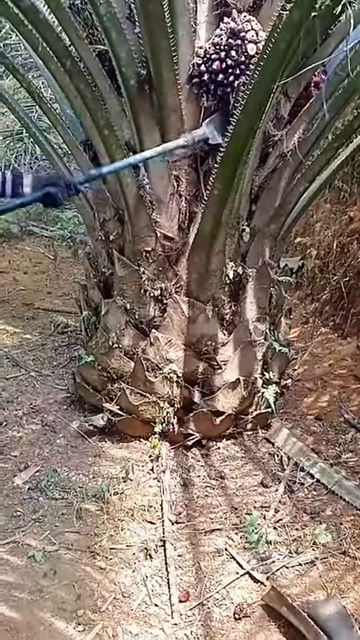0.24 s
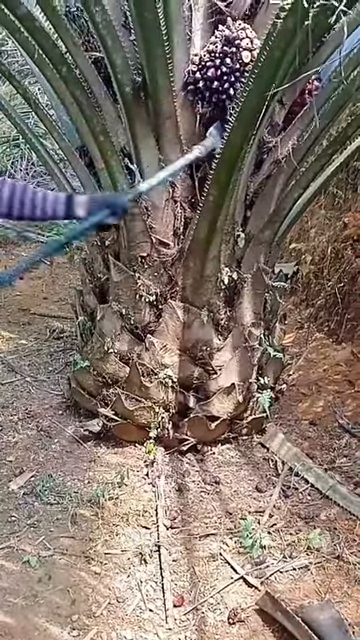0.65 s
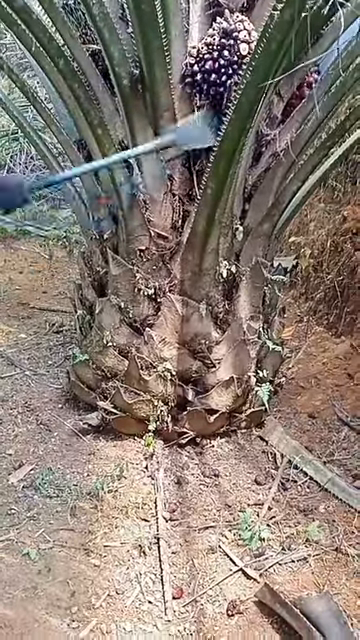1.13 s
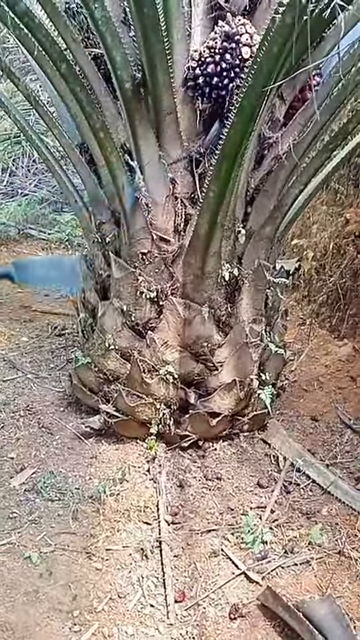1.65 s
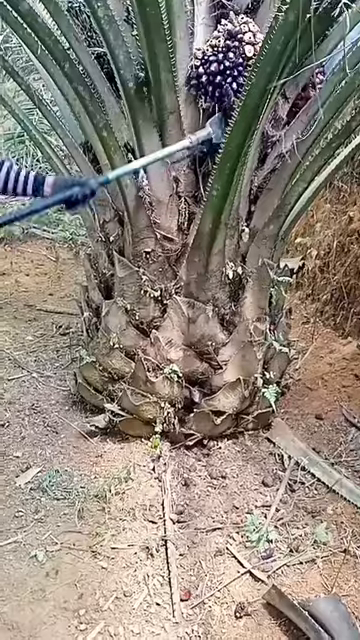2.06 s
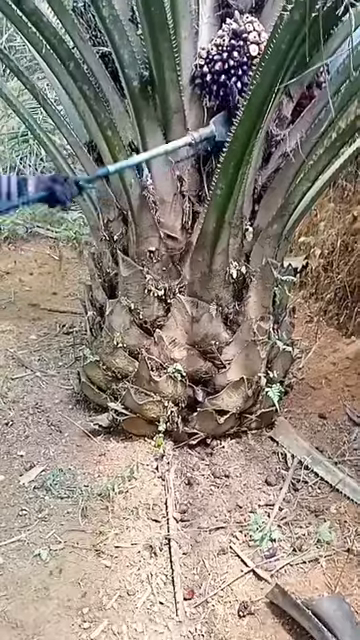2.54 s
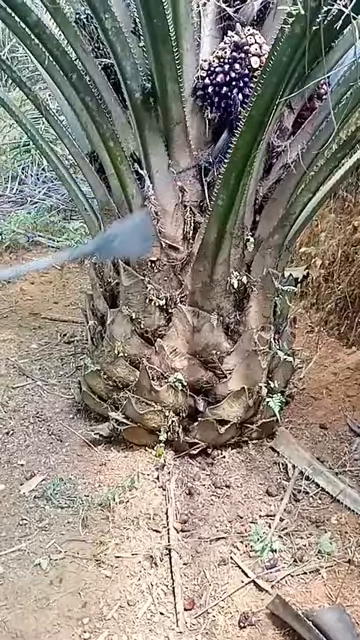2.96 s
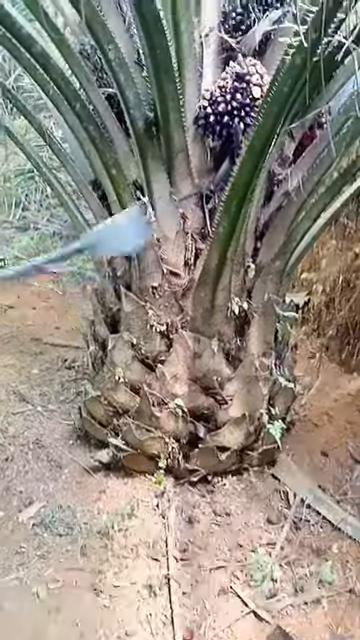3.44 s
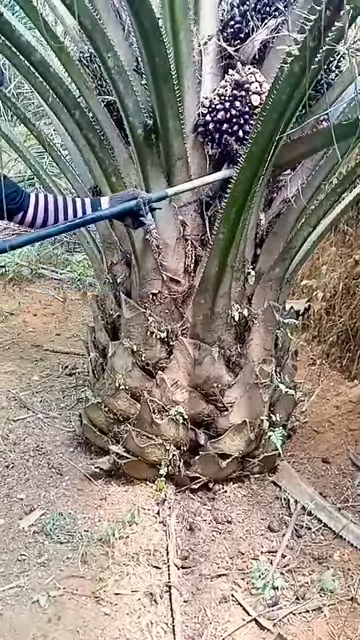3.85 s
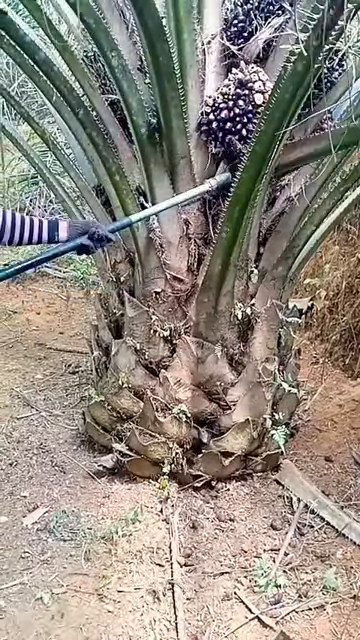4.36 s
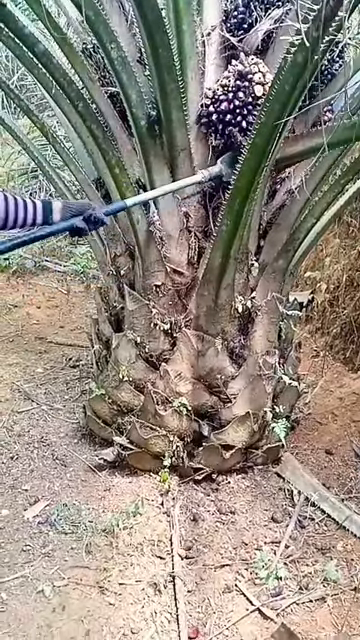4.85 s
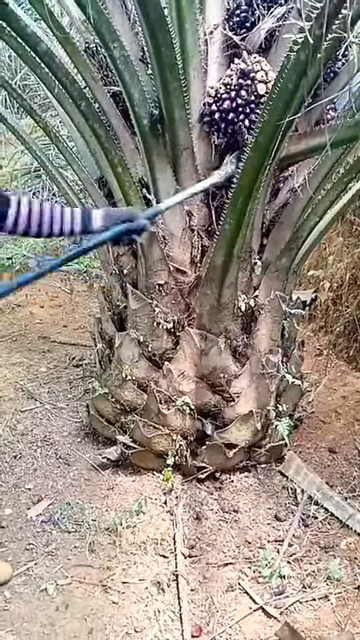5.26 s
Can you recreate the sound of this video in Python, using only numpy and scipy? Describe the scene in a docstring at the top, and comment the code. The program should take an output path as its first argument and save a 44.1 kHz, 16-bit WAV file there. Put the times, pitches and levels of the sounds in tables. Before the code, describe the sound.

A close mono outdoor take: a loud woody chop with metallic edge comes almost at once, then levering creaks, small knocks and brittle snaps. A second chop follows near the middle, a third late, leading into a run of sharp splintering and leaf hiss. Twice the freed steel rings very faintly. A thin insect chorus and distant peeps stay behind.

```python
"""Insects shrill and a far bird peeps; then a steel chisel on a long pole strikes an oil palm three times.
Each blow is a noise of breaking fibres that excites the pole, followed by damped knocks of stalk and crown.
The blade, levered or pulled out, creaks by stick-slip friction; fibres snap as short bursts with damped ticks.
The shaken fronds hiss as dense brushing grains; twice the steel slides free and rings as beating sines."""
import sys
import numpy as np
from scipy import signal
from scipy.fft import rfft, irfft
from scipy.io import wavfile
from scipy.ndimage import uniform_filter1d

SR = 44100
rng = np.random.default_rng(int(sys.argv[2]) if len(sys.argv) > 2 else 0)


def wav_record(signal):
    """Record a signal, one row per channel, as 16-bit PCM in the file named by sys.argv[1]."""
    frames = np.transpose(np.atleast_2d(signal))
    bounded = np.clip(frames, -1, 1)
    # unit amplitude maps onto the largest positive 16-bit level
    quanta = np.round(bounded * 32767).astype(np.int16)
    wavfile.write(sys.argv[1], SR, quanta)


N = 242550
TIME = np.arange(N) / SR

# All table levels are relative: each source applies its own gain.
# The chisel bites in: (time [s], woody crunch level [dB], splinter level [dB], trunk rumble level [dB],
# time in the cut [s], t60 [s], rind crack level [dB], knock level [dB], crown rocking level [dB])
BLOWS = [(0.404, -16.5, -11.5, -46, 0.021, 0.11, -9.5, -5.5, -24),
         (2.6925, -14.5, -11.5, -32, 0.02, 0.09, -12.5, -6, -24),
         (4.3, -14, -16, -31.5, 0.034, 0.11, -13.5, -3, -40)]
# Every blow first cracks the rind
RIND_DELAY_S, RIND_SPLINTER_DB, RIND_T60_S = 0.0007, -12, 0.051
# Then the blade enters, stops and rebounds; levels are added to the blow's knock level:
# (delay [s], hollow knock level [dB], low thud level [dB])
BLOW_KNOCKS = [(.003, -5.5, -25), (.016, 1, -13.5), (.031, -10.5, -28)]
BLOW_KNOCK_HZ, ROCK_DELAY_S = 852, 0.0242
# Resonances of pole and blade: (frequency [Hz], width [Hz], level [dB])
POLE_MODES = [(1244, 35, 1), (1657, 28, 6), (1883, 45, 5), (2010, 35, 4), (2253, 30, 5), (2533, 30, 6),
              (2674, 30, 4), (3742, 28, 6), (4057, 32, 6), (4425, 35, 0), (5220, 40, -1), (6083, 30, 0),
              (6234, 30, 2), (6325, 30, -1), (7022, 35, 2), (7969, 30, 2), (8243, 30, 1)]
# Resonances of the trunk: (frequency [Hz], width [Hz], level [dB])
TRUNK_MODES = [(180, 50, -6), (270, 45, -4), (324, 40, 0), (400, 50, -4), (503, 40, -2), (610, 50, -5)]
# Spectrum of thick breaking fibres: (frequency [Hz], level [dB])
CRUNCH_SPECTRUM = [(100, -59), (300, 6.5), (700, -2), (1000, 5.5), (1400, -0.5), (1900, 1.5), (2400, 0.5),
                   (3100, 0.5), (4100, 1.5), (5500, -0.5), (9000, -10.5)]
# Spectrum of thin breaking fibres: (frequency [Hz], level [dB])
SPLINTER_SPECTRUM = [(1500, -42), (3500, 1), (5200, -3.5), (6500, 6), (8200, 5.5), (9700, -2), (12000, -2),
                     (15500, -18)]

# Fibres snap and crack, and the blade first touches at 0.398 s:
# (time [s], splinter level [dB], woody crunch level [dB], t60 [s])
SNAPS = [(0.304, -32.5, -47.5, 0.11), (0.398, -31, -23, 0.057), (0.6611, -39, -25, 0.07),
         (0.6804, -46, -27, 0.086), (0.828, -25, -53, 0.062), (0.8807, -21, -41, 0.035),
         (0.9281, -20, -34, 0.047), (1.5675, -14.5, -30, 0.087), (2.131, -26, -58, 0.094),
         (2.1827, -20.5, -35.5, 0.09), (2.878, -26, -25.5, 0.085), (3.1623, -31, -48, 0.15),
         (3.2874, -37, -26.5, 0.15), (3.2975, -38, -31, 0.086), (3.3232, -13.5, -63, 0.092),
         (3.481, -28, -36.5, 0.13), (4.353, -15, -21.5, 0.098), (4.3691, -12.5, -33.5, 0.16),
         (4.3884, -12, -32, 0.07), (4.4582, -10.5, -29, 0.056), (4.5344, -11.5, -30, 0.13),
         (4.6489, -17, -34, .05), (4.7204, -16.5, -28.5, 0.052), (4.8396, -18, -36, 0.069),
         (4.859, -15.5, -34, 0.088), (4.902, -26, -29.5, 0.091), (5.043, -25, -49, 0.027),
         (5.2182, -18.5, -45, 0.01), (5.3675, -24.5, -58, 0.1)]
# Damped modes of the crack: (frequency [Hz], level [dB], t60 [s])
CRACK_MODES = [(1820, -9, 0.019), (1898, -0.5, 0.016), (2080, 5, 0.014), (2448, 2.5, 0.026),
               (3312, -3, 0.0076), (4070, -13, 0.027)]
# Damped modes of the brittle tick: (frequency [Hz], level [dB], t60 [s])
TICK_MODES = [(4300, -20, 0.016), (5840, -17, .012), (6440, -8.5, 0.0068), (7570, 16, 0.015),
              (8670, 5, 0.0063), (9500, -13, .01), (11700, -1, 0.0086)]
# Thin fibres snap at random; levels are added to that of the shaken fronds
SMALL_SNAPS_PER_S, SMALL_T60_S = 9.2, 0.023
SMALL_SPLINTER_DB, SMALL_CRUNCH_DB, SMALL_SPREAD_DB = 16, 0, 1

# The blade knocks in the stalk:
# (time [s], hollow knock level [dB], knock pitch [Hz], low thud level [dB])
KNOCKS = [(0.66, -14, 855, -48), (0.681, -14.5, 817, -38), (1.434, -26.5, 826, -44),
          (1.874, -34, 860, -34.5), (2.879, -25, 750, -51), (2.901, -33, 800, -33.5),
          (3.289, -19, 1010, -54), (4.388, -23.5, 830, -27.5), (4.416, -23.5, 976, -40),
          (4.915, -50, 990, -38), (4.987, -12, 977, -33.5), (5.048, -21, 990, -62),
          (5.369, -22.5, 956, -70), (5.435, -39, 930, -41.5)]
# The heavy crown rocks back: (time [s], level [dB])
BUMPS = [(0.3, -37), (0.454, -33), (0.698, -36), (0.927, -36), (2.945, -36.5), (4.364, -29.5), (4.392, -38)]
# Damped modes of the hollow stalk: (frequency [Hz], level [dB], t60 [s])
KNOCK_MODES = [(913, 4.5, 0.025), (792, -13, 0.022), (1044, -2, 0.028), (1268, -9, 0.023),
               (1830, -9.5, 0.031), (2600, -12, 0.018)]
# Damped modes of the low thud: (frequency [Hz], level [dB], t60 [s])
THUD_MODES = [(255, -6, .035), (324, 0, .045), (400, -6, .03), (500, -9, .025)]
# Damped modes of the rocking crown: (frequency [Hz], level [dB], t60 [s])
CROWN_MODES = [(72, -28, .12), (97, -1, 0.1), (177, 1.5, 0.087)]
# Tugged back, the blade judders: a run of growing knocks
JUDDER_START_S, JUDDER_GAP_S, JUDDER_GROWTH_DB = 1.588, 0.018, 1.15
JUDDER_KNOCK_DB, JUDDER_THUD_DB, JUDDER_HZ = -25, -33, 874
JUDDER_UNEVEN, JUDDER_DETUNE = 0.118, 0.036  # spreads, as shares of the gap and of the pitch

# The blade is levered in the stalk or rubs as it is pulled out:
# (start [s], length [s], creak level [dB], rasp level [dB], main stalk resonance [Hz])
STALK_STROKES = [(0.524, 0.12, -21, -24, 894), (1.36, 0.084, -49.5, -57, 866),
                 (1.58, 0.032, -38.5, -36.5, 900), (1.713, 0.056, -44, -52, 820),
                 (1.788, 0.078, -36.5, -36.5, 790), (2.806, 0.021, -29.5, -31, 890),
                 (2.852, 0.025, -31.5, -54, 900), (3.283, 0.011, -27, -30, 863),
                 (3.347, 0.091, -40, -37.5, 853), (4.949, 0.056, -32, -42, 1014),
                 (5.33, 0.12, -38, -40, 938)]
# Resonances of the wedged stalk: (frequency [Hz], width [Hz], level [dB])
STALK_MODES = [(900, 80, 0), (810, 70, -2), (1000, 60, -2), (1150, 90, -9)]
# Spectrum of the friction rasp: (frequency [Hz], level [dB])
RASP_SPECTRUM = [(600, -45), (1300, -33), (1700, 10), (2050, 3.5), (2300, 4), (3000, 0), (4300, -0.5),
                 (5000, -16), (10000, -21)]
# Each stroke grips, builds up and lets go; the rasp needs more force than the creak
GRIP_S, CREAK_BUILD_DB, RASP_BUILD_DB, LET_GO_T60_S = 0.027, 8, 12.5, 0.1

# The blade slides free and sings: (time [s], main mode level [dB], upper modes level [dB])
RELEASES = [(1.89, -51, -44), (3.498, -38.5, -43)]
# Upper modes of the blade: (frequency [Hz], level [dB])
BLADE_UPPER = [(3550, 0), (5005, -3)]
BLADE_HZ = 3310
RELEASE_RISE_S, BLADE_T60_S, BLADE_UPPER_T60_S = 0.0047, 4.3, 0.41
# Once the pole is drawn back, the new grip damps the main mode
REGRIP_AFTER_S, REGRIP_T60_S = 0.26, 1.2
# The moving blade beats against its own echo, ever slower and fainter as the pole comes away
SWING_BEAT_HZ, SWING_STOP_S = 33.3, 0.2235  # first beat rate and its decay time constant
SWING_ECHO_DB, SWING_ECHO_T60_S = -2.5, 2.9

# The fronds are shaken: (start [s], swell [s], level [dB], settling t60 [s])
SHAKES = [(-0.1, 0.21, -63.5, 17), (0.39, .06, -48.5, 4.1), (0.77, 0.093, -49, 1.1), (1.27, .18, -49, 3.4),
          (1.6, 0.26, -46.5, 0.61), (2.3, 0.22, -66.5, 2), (2.69, 0.033, -45.5, 1.86),
          (3.05, 0.13, -59, 2.7), (3.28, 0.16, -45, 0.44), (4.3, 0.068, -38, 1.7),
          (4.55, 0.098, -39.5, 1.7), (5.0, 0.14, -57, 4.4), (5.3, 0.12, -57.5, 2)]
LEAVES_AT_REST_DB = -71.5
# Spectrum of the brushing leaflets: (frequency [Hz], level [dB])
LEAVES_SPECTRUM = [(100, -13), (350, -5.5), (1000, -6.5), (2000, -5), (3000, -4.5), (4500, 0), (6500, 2.5),
                   (8200, 4.5), (10000, -3), (12500, -7), (15500, -19)]

# Far birds: (centre time [s], frequency [Hz], level [dB], length [s])
PEEPS = [(0.118, 3290, -48.5, 0.041), (0.268, 4770, -57, 0.06), (1.317, 3180, -51, 0.052),
         (2.566, 3120, -54, 0.053), (2.977, 1566, -45.5, 0.042), (3.612, 4920, -53, 0.088),
         (4.243, 4700, -50, 0.04)]
# Spectrum of the insect chorus: (frequency [Hz], level [dB])
INSECTS_SPECTRUM = [(5500, -82), (6300, -18.5), (6750, -7), (7050, 1.5), (7170, 5), (7260, 5), (7370, 2.5),
                    (7600, 1), (7850, -9), (8500, -67), (9500, -32)]
# Spectrum of the open air: (frequency [Hz], level [dB])
AIR_SPECTRUM = [(20, -12), (45, -9), (70, 0), (110, 2.5), (300, -3), (1000, -6.5), (2500, -13.5),
                (5000, -13.5), (10000, -25), (13000, -27), (14700, -10), (16000, -29)]
CUTOFF_HZ = 15800


def chisel():
    """Forced vibration: fracture noise drives pole and steel; the trunk rumble builds more slowly."""
    out = 0
    trunk = even(resonate(grains(3000, spread_db=3.5), TRUNK_MODES))
    for s, crunch_db, splinter_db, rumble_db, hold, t60, *_ in BLOWS:
        cutting = fade(s, hold, t60) * fibres(from_db(crunch_db), from_db(splinter_db))
        # each blow excites the modes a little differently
        excited = [(hz, width, db + 2 * rng.standard_normal()) for hz, width, db in POLE_MODES]
        pole = resonate(cutting, excited)
        rumble = from_db(rumble_db) * fade(s, hold, 0.13, rise=0.023) * trunk
        out = out + from_db(-6.5) * cutting + from_db(-9.0) * pole + rumble
    return out


def fibres(crunch, splinter):
    """Fracture noise: thick fibres break as a low crunch, thin ones as a bright splintering."""
    thick = coloured(grains(7000, spread_db=-0.5), CRUNCH_SPECTRUM)
    thin = coloured(grains(8200, spread_db=0.5), SPLINTER_SPECTRUM)
    return crunch * thick + splinter * thin


def snaps(brittle_s=0.023):
    """Brittle fracture: a sharp crack, then a crumble; the quicker the break, the harder its tick."""
    rind = [(s + RIND_DELAY_S, RIND_SPLINTER_DB, db, RIND_T60_S) for s, *_, db, _, _ in BLOWS]
    breaks = rind + SNAPS + small_snaps()
    crunch, splinter = 0, 0
    for s, splinter_db, crunch_db, t60 in breaks:
        burst = fade(s, 0.0025, t60, rise=0.00021)
        crunch = crunch + burst * from_db(crunch_db - 3.5)
        splinter = splinter + burst * from_db(splinter_db - 12.0)
    crumble = fibres(crunch, splinter)
    crack_hits = [(s, db, 1) for s, _, db, _ in breaks]
    tick_hits = [(s, db + 12 * np.log10(brittle_s / t60), 1) for s, db, _, t60 in breaks]
    crack = struck(crack_hits, CRACK_MODES, contact_s=0.0004, detune=0.025)
    tick = struck(tick_hits, TICK_MODES, contact_s=0.00022, detune=0.084)
    pole = from_db(-5) * resonate(crumble, POLE_MODES)
    return crumble + pole + from_db(2) * crack + from_db(-6) * tick


def small_snaps():
    """Random fracture: thin fibres break by chance, louder as the fronds move more; rows as in SNAPS."""
    at = np.flatnonzero(rng.random(N) < SMALL_SNAPS_PER_S / SR)
    level_db = 20 * np.log10(shaking()) + SMALL_SPREAD_DB * rng.standard_normal(N)
    return [(i / SR, level_db[i] + SMALL_SPLINTER_DB, level_db[i] + SMALL_CRUNCH_DB, SMALL_T60_S)
            for i in at]


def stalk():
    """Impact on damped bodies: the blade stops in the hollow-sounding stalk and the crown rocks."""
    blows = [(s + delay, db + knock_db, BLOW_KNOCK_HZ, db + thud_db)
             for s, *_, db, _ in BLOWS for delay, knock_db, thud_db in BLOW_KNOCKS]
    knocks = blows + KNOCKS + judder(count=4)
    bumps = [(s + ROCK_DELAY_S, db) for s, *_, db in BLOWS] + BUMPS
    knock_hits = [(s, db, hz / KNOCK_MODES[0][0]) for s, db, hz, _ in knocks]
    thud_hits = [(s, db, 1) for s, _, _, db in knocks]
    rock_hits = [(s, db, 1) for s, db in bumps]
    knock = struck(knock_hits, KNOCK_MODES, contact_s=0.00076, detune=0.012)
    thud = struck(thud_hits, THUD_MODES, contact_s=0.0057, detune=0.042)
    rock = struck(rock_hits, CROWN_MODES, contact_s=0.009, detune=0.069)
    return from_db(-4.5) * knock + from_db(4.0) * thud + from_db(-5.0) * rock


def judder(count):
    """Repeated impact: the stuck blade returns in uneven, ever harder jerks; rows as in KNOCKS."""
    jerks = []
    for k, (late, sharp) in enumerate(rng.standard_normal((count, 2))):
        s = JUDDER_START_S + JUDDER_GAP_S * (k + JUDDER_UNEVEN * late)
        hz = JUDDER_HZ * (1 + JUDDER_DETUNE * sharp)
        growth_db = k * JUDDER_GROWTH_DB
        jerks.append((s, JUDDER_KNOCK_DB + growth_db, hz, JUDDER_THUD_DB + growth_db))
    return jerks


def creak(slips_per_s=175, jitter=0.3, friction_db=0):
    """Stick-slip friction: uneven slips of steel in wet wood, with friction noise, drive the stalk."""
    count = np.floor(np.cumsum(slips_per_s * np.exp(jitter * drift(90))) / SR)
    slips = np.diff(count, prepend=0) * from_db(0.6 * drift(60))
    drive = rms_one(slips) + from_db(friction_db) * rng.standard_normal(N)
    # wet wood softens each slip
    drive = signal.sosfilt(signal.butter(3, [270, 1400], "band", fs=SR, output="sos"), drive)
    # each slip opens the rasp, which closes again with a 2 ms time constant
    gate = 0.35 + signal.lfilter([1], [1, -np.exp(-1 / (0.002 * SR))], slips)
    rasp = coloured(gate * rng.standard_normal(N), RASP_SPECTRUM)
    trunk = 0.38 * rms_one(resonate(drive, TRUNK_MODES))
    out = 0
    for s, length, creak_db, rasp_db, hz in STALK_STROKES:
        stroke = swell(s, min(GRIP_S, length), length, LET_GO_T60_S)
        slack = np.clip(1 - (TIME - s) / length, 0, 1)
        modes = [(f * hz / STALK_MODES[0][0], width, db) for f, width, db in STALK_MODES]
        wedged = rms_one(resonate(drive, modes))
        creak_gain = from_db(creak_db - CREAK_BUILD_DB * slack - 1.47)
        rasp_gain = from_db(rasp_db - RASP_BUILD_DB * slack - 3.0)
        out = out + stroke * even(trunk + wedged) * creak_gain
        out = out + stroke * rasp * rasp_gain
    return out


def blade():
    """Free vibration with beats: one long mode wavers against its echo, above it two short modes."""
    out = 0
    upper = sum(from_db(db) * np.sin(2 * np.pi * hz * TIME) for hz, db in BLADE_UPPER)
    phase = 2 * np.pi * BLADE_HZ * TIME
    for s, main_db, upper_db in RELEASES:
        age = np.maximum(TIME - s, 0)
        beats = SWING_BEAT_HZ * SWING_STOP_S * (1 - np.exp(-age / SWING_STOP_S))  # in cycles
        echo_gain = from_db(SWING_ECHO_DB) * fade(s, 0, SWING_ECHO_T60_S)
        echo = echo_gain * np.sin(phase + 2 * np.pi * beats)
        regrip = fade(s, REGRIP_AFTER_S, REGRIP_T60_S)
        ring = fade(s, 0, BLADE_T60_S, rise=RELEASE_RISE_S) * regrip
        upper_ring = fade(s, 0, BLADE_UPPER_T60_S, rise=RELEASE_RISE_S)
        out = out + from_db(main_db) * ring * (np.sin(phase) + echo)
        out = out + from_db(upper_db) * upper_ring * upper
    return out


def fronds():
    """Granular friction: stiff leaflets brush in quick uneven strokes, a hiss with crackles in it."""
    level = shaking() * from_db(1.0 * drift(28) + 1.0 * drift(90))
    hiss = grains(9000, spread_db=-2.0)
    crackles = from_db(-9.0) * grains(600, spread_db=4.0)
    return from_db(8.0) * level * coloured(hiss + crackles, LEAVES_SPECTRUM)


def shaking():
    """Addition of powers: each shake of the fronds swells and settles above the level at rest."""
    power = from_db(LEAVES_AT_REST_DB) ** 2
    for s, rise, db, t60 in SHAKES:
        power = power + (from_db(db) * swell(s, rise, rise, t60)) ** 2
    return np.sqrt(power)


def plantation():
    """Modulated noise and blurred tones: a throbbing insect chorus, distant peeps and the open air."""
    throb = np.sin(2 * np.pi * np.cumsum(21 * (1 + 0.05 * drift(8.4))) / SR)  # about 21 Hz
    insect_gain = from_db(-43.5 + 1.4 * throb + 1.4 * drift(6))
    insects = insect_gain * coloured(rng.standard_normal(N), INSECTS_SPECTRUM)
    blur = 1.4 * drift(150)  # echoes off the trees scramble the phase
    peeps = 0
    for s, hz, db, length in PEEPS:
        envelope = np.exp(-(2 * (TIME - s) / length) ** 2)
        peeps = peeps + from_db(db) * envelope * np.sin(2 * np.pi * hz * TIME + blur)
    air = from_db(-59.0) * coloured(rng.standard_normal(N), AIR_SPECTRUM)
    return insects + peeps + air


def grove(x, t60=0.76, wet_db=-22):
    """Diffuse scattering: trunks and fronds return a thin, decaying noise tail."""
    age = TIME[:SR]
    tail = rng.standard_normal(SR) * from_db(-60 * age / t60) * np.minimum(age / 0.0074, 1)
    tail = tail / np.sqrt(np.sum(tail ** 2))
    return x + from_db(wet_db) * signal.fftconvolve(x, tail)[:N]


def struck(hits, modes, contact_s, detune):
    """Modal impact: hits (time [s], peak [dB], pitch factor) land elsewhere each time, so modes vary."""
    out, age = np.zeros(N + SR), TIME[:SR // 8]
    for s, db, pitch in hits:
        chance = rng.standard_normal((len(modes), 2))
        ring = 0
        for k, ((hz, level, t60), (a, b)) in enumerate(zip(modes, chance)):
            decay = from_db(level + 2.3 * a - 60 * age / t60)
            tone = np.sin(2 * np.pi * hz * pitch * (1 + detune * b) * age)
            ring = ring + decay * tone * (-1) ** (k // 2)  # polarity flips every two modes
        ring = ring * (1 - np.exp(-age / contact_s))  # a longer contact softens the onset
        at = int(s * SR)
        out[at:at + len(age)] += from_db(db) * ring / np.abs(ring).max()
    return out[:N]


def resonate(x, modes):
    """Parallel resonance: two-pole filters, each with unit gain at its peak before its own level."""
    out = 0
    for hz, width, db in modes:
        r = np.exp(-np.pi * width / SR)
        zeros = np.array([1, 0, -1]) * (1 - r * r) / 2
        poles = [1, -2 * r * np.cos(2 * np.pi * hz / SR), r * r]
        out = out + from_db(db) * signal.lfilter(zeros, poles, x + 1e-18)
    return out


def grains(per_s, spread_db):
    """Shot noise: tiny impulses at random moments, of uneven size and either sign; rms 1."""
    sizes = from_db(spread_db * np.minimum(rng.exponential(1, N), 4)) * rng.choice([-1, 1], N)
    return rms_one(sizes * (rng.random(N) < per_s / SR))


def coloured(x, spectrum):
    """Spectral shaping: weight a signal in frequency, 20 dB per octave down beyond the ends; rms 1."""
    hz, db = np.transpose(spectrum)
    f = np.maximum(np.arange(N // 2 + 1) * SR / N, 1)
    octaves_outside = np.maximum(np.log2(hz[0] / f), 0) + np.maximum(np.log2(f / hz[-1]), 0)
    gain_db = np.interp(np.log(f), np.log(hz), db) - 20 * octaves_outside
    return rms_one(irfft(rfft(x) * from_db(gain_db), N))


def drift(rate):
    """Low-pass random motion: slow chance with spread 1, its corner near rate [Hz]."""
    steps = rng.standard_normal(int(N / SR * 400) + 2)  # 400 steps per second
    r = np.exp(-2 * np.pi * rate / 400)
    slow = signal.lfilter([1], [1, -2 * r, r * r], steps)
    return np.interp(TIME, np.linspace(0, N / SR, len(slow)), rms_one(slow))


def fade(start, hold, t60, rise=0.00037):
    """Exponential decay: a quick rise, a hold counted from the start, then a steady fall in dB."""
    age = np.maximum(TIME - start, 0)
    fall_db = np.minimum(60 * np.maximum(age - hold, 0) / t60, 200)
    return np.minimum(age / rise, 1) * from_db(-fall_db)


def swell(start, rise, hold, t60):
    """Gradual onset: a smooth sine-squared rise into a hold and an exponential decay."""
    onset = np.sin(np.pi / 2 * np.clip((TIME - start) / rise, 0, 1)) ** 2
    return onset * fade(start, hold, t60)


def even(x):
    """Short-time normalization: hold a noisy ring near rms 1 from moment to moment."""
    return x / np.sqrt(uniform_filter1d(x ** 2, size=700) + 1e-12)


def rms_one(x):
    """Normalization of mean power to one."""
    return x / np.sqrt(np.mean(x ** 2) + 1e-20)


def from_db(db):
    """Logarithmic level law: 20 dB is a factor of ten in amplitude."""
    return 10 ** (np.asarray(db) / 20)


def scene():
    """Superposition: the work at the palm echoes in the grove; fronds, blade and background add dry."""
    work = chisel() + snaps() + stalk() + creak()
    work = signal.sosfilt(signal.butter(2, 55, "high", fs=SR, output="sos"), work)
    return (grove(work) + fronds() + blade() + plantation())[None]


def record(dry):
    """Saturation and band limiting: peaks are rounded, then the top is cut."""
    top = 1.2
    rounded = top * np.tanh(dry / top)
    return signal.sosfilt(signal.ellip(10, 0.2, 80, CUTOFF_HZ, fs=SR, output="sos"), rounded)


dry = scene()
out = record(dry)
wav_record(out)
```